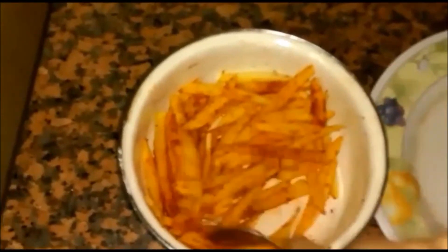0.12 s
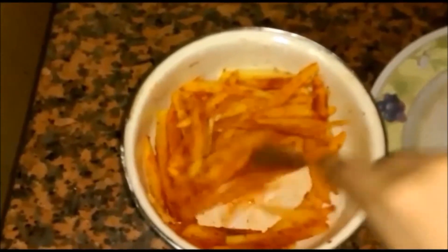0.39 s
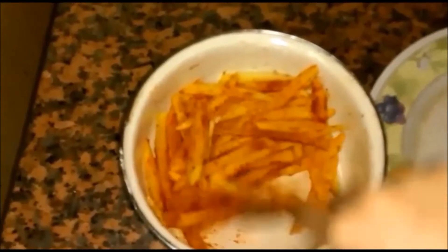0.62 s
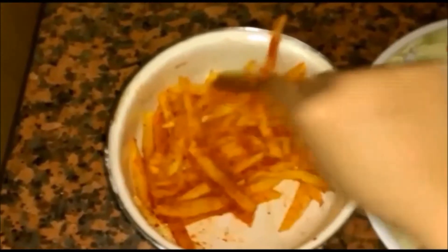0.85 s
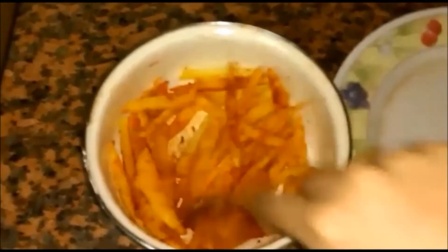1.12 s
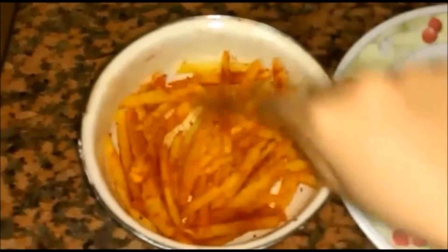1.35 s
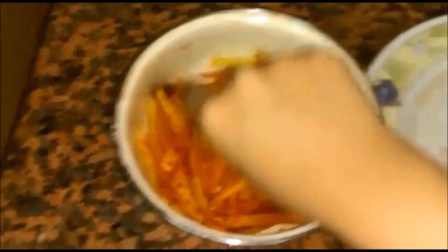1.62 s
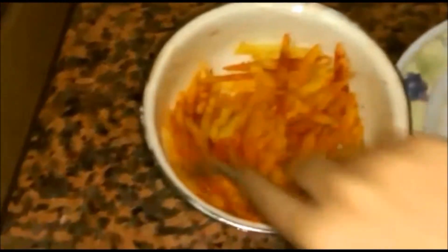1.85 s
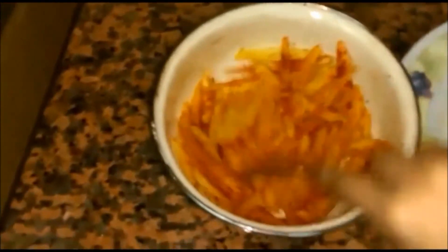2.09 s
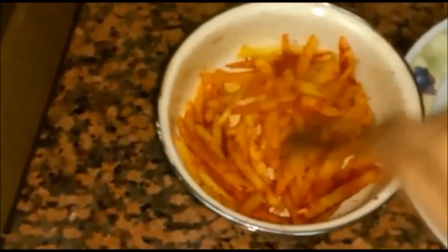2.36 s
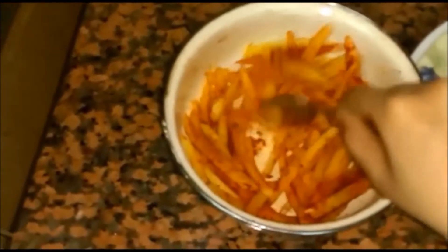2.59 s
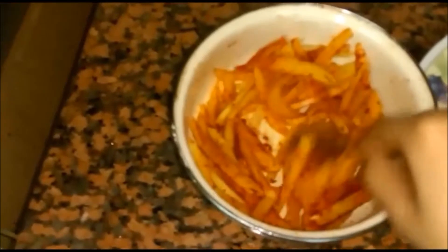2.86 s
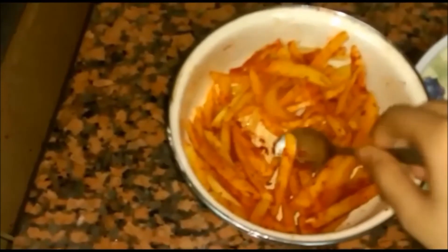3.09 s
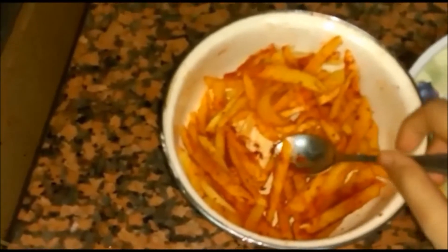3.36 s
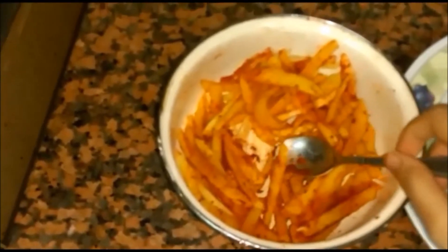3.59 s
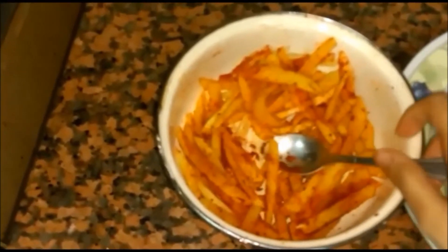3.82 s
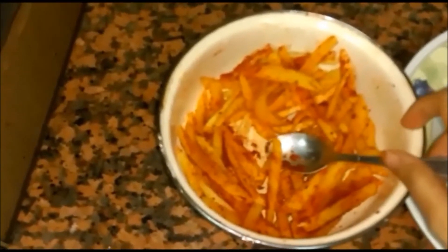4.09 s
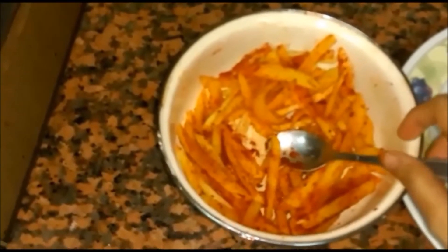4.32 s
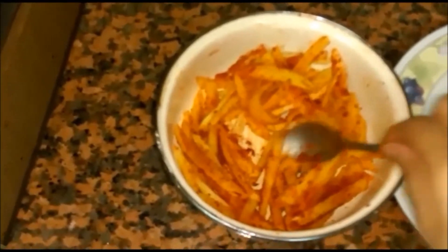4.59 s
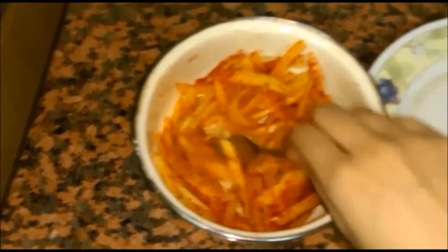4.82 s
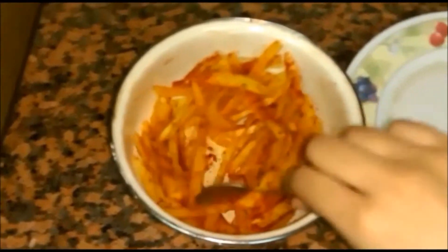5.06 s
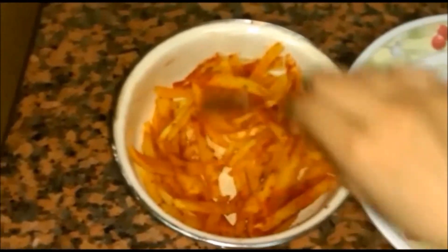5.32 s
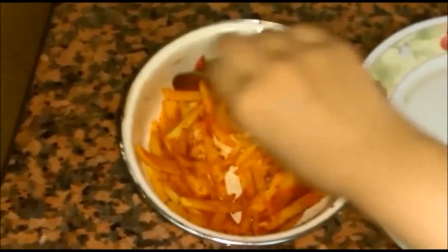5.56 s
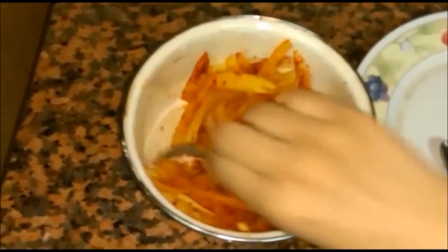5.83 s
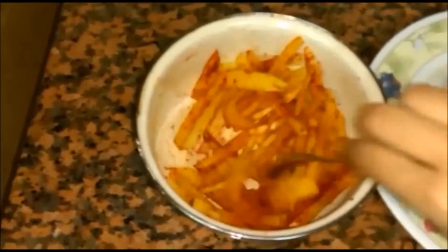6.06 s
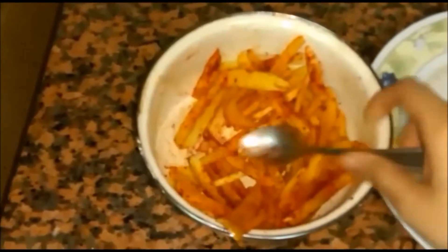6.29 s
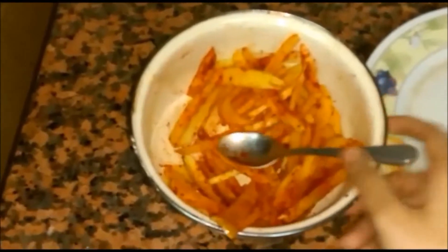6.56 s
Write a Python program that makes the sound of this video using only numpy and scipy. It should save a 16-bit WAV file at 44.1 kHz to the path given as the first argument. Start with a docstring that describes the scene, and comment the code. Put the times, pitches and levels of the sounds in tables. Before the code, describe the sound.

Dull spoon taps and short gritty scrapes while stirring food in a bowl, a quiet pause midway, then three quick bright clinks at the end.

```python
"""Over steady air hiss, a fridge hum and hand rumble, a steel spoon scrapes, knocks and clinks in an enamel bowl.
The bowl stands on a stone counter, mostly left of a hand-held phone with two ports, in a small hard kitchen.
Short contacts ring the spoon's thin modes and the food-damped bowl; streams of tiny impacts make the scrapes.
Once the bowl rattles on the stone. Echoes and a noise tail place all this in the room.
The air, fan, hum and hand are shaped noise, with a steady-pitched tone for the lowest hum line."""
import sys
import numpy as np
from scipy import signal
from scipy.fft import rfft, irfft, next_fast_len
from scipy.io import wavfile

SR = 44100
rng = np.random.default_rng(int(sys.argv[2]) if len(sys.argv) > 2 else 0)


def elevation(decibels):
    """Turn decibel levels (scalar or array-like) into linear amplitude ratios."""
    levels = np.asarray(decibels, float)
    return 10 ** (levels / 20)


def wrap_up_sound(samples):
    """Save the sound to the file named by the first command line argument, as 16-bit audio."""
    columns = np.atleast_2d(samples).T
    # keep every value between -1 and 1, then stretch to whole-number steps
    tamed = np.clip(columns, -1, 1)
    steps = np.round(tamed * 32767).astype(np.int16)
    wavfile.write(sys.argv[1], SR, steps)


N = 294588
T = np.arange(N) / SR

# spoon lands in the food-covered bowl: t/s, peak level at 2.4 kHz/dB, tilt/dB per octave,
# arch/dB per octave squared, left minus right/dB
KNOCK_EVENTS = [(.1004, -43, 8.5, -2.2, -24.5), (.1133, -48.5, -3, 5, -10), (0.2102, -39.5, 3, -6.5, -19),
                (0.2164, -64, -17, 6, 19), (0.2231, -41.5, 13.5, -11, -12), (.3641, -55, -5, 5.5, 2.2),
                (.4032, -20, 0.44, 0.33, 21), (.6878, -21, -3, -9.5, 9), (0.7381, -28, -4.5, -4.5, 27.5),
                (0.7419, -33, 11, -4.5, 6), (1.0328, -50.5, 2.2, -5, 9), (1.7576, -30, 5, -2.2, 5),
                (2.0092, -57, 1.5, 0.3, 6), (2.099, -29, -5.5, -0.8, 19), (2.79, -50, -14.5, -5.5, 23),
                (3.6094, -71, .1, 2.5, -3), (3.6824, -61.5, 9, -3, -27), (3.7328, -66, 3, .6, .1),
                (3.7439, -59, -2, 2.2, -3), (3.912, -72, 1, 4.5, 1.2), (4.0306, -34.5, 7, -4.5, 14),
                (4.4206, -65.5, -11, 7, 10.5), (4.8901, -39, -5, -1.5, 12), (5.669, -35, 7.5, -1.8, 23.5),
                (5.8496, -50.5, 1, 2.5, 14), (6.2394, -52, -7, -3, 6), (6.465, -59.5, 6, 0, 10.5),
                (6.6215, -25, 3, 0, 16.5), (6.6387, -24.5, 9, -4, 7), (6.6564, -30.5, 5, -1.3, 13)]
# ringing modes of the steel spoon: f/Hz, level/dB, t60/s,
# share at the right port (each mode beams its own way, minus = opposite lobe)
SPOON_MODES = [(1545, -9, .13, .45), (1665, -7, .07, .45), (1800, -4, .03, .4), (2600, 0, .19, -1.1),
               (2815, -14, .1, -.7), (3512, 0, .24, .5), (4250, 0, .16, .6), (4716, -5, .13, .6),
               (5068, -1, .17, .6), (5375, -11, .1, .6), (5852, -6, .07, .6), (6470, 0, .07, -.8),
               (7246, -12, .12, .6), (7531, -3, .12, .6), (8694, -9, .06, .3), (9232, 0, .07, .2),
               (9415, -3, .09, .3), (9680, -7, .06, .3), (9938, -7, .07, .4), (11500, -16, .04, .6)]
# modes of the enamel bowl under its food: f/Hz, level/dB, t60/s
BOWL_MODES = [(350, -19, .02), (620, -12, .01), (1150, 0, .009), (1650, 0, .009), (2600, 0, .006),
              (3650, 0, .004), (4700, 0, .004), (5800, -1, .004), (7700, -3, .004), (8500, -3, .004),
              (9400, 0, .005), (10400, -4, .004), (11700, -9, .003), (13500, -11, .002)]
# first blow of the bowl on the stone: t/s, level/dB
FIRST_BLOW = (2.1, -21)


def unit(x):
    """Scale to rms 1."""
    return x / np.sqrt(np.mean(x ** 2, axis=-1, keepdims=True))


def add(out, s, sound):
    """Mix a sound in at time s, cutting what runs past the end."""
    i = int(s * SR)
    out[..., i:i + sound.shape[-1]] += sound[..., :N - i]


def shaped(gain, channels):
    """Noise whose spectrum is gain(Hz), rms 1."""
    size = next_fast_len(N)
    hz = np.maximum(np.arange(size // 2 + 1) * SR / size, 1)
    spectrum = rfft(rng.standard_normal((channels, size))) * gain(hz)
    return unit(irfft(spectrum, size)[:, :N])


def peak(hz, width):
    """Gain curve of a resonance, width taken at half amplitude."""
    return lambda f: 1 / (1 + (2 * (f - hz) / width) ** 2)


def swell(s, db, rise_s, fall_s):
    """Gain that climbs evenly in dB to its peak at s and sinks again."""
    swell_db = 21.5  # change within one rise or fall time
    return elevation(db - swell_db * np.maximum((s - T) / rise_s, (T - s) / fall_s))


def ports(sound, pan_db):
    """Rows: left port, right port, and what goes out into the room."""
    return elevation(np.array([[pan_db / 2], [-pan_db / 2], [0]])) * sound


def alike(hz):
    """Share of a diffuse field's power that both ports hear the same, mostly in the bass."""
    return 0.18 / (1 + (hz / 650) ** 3)


def air():
    """Diffuse air noise: a part common to both ports plus a separate part at each."""
    # f/Hz, relative spectrum level/dB per Hz
    air_rows = [(18, -44), (30, -7), (184, -8.5), (227, -13), (295, -13.5), (600, -16.5), (937, -17.5),
                (1160, -14), (1460, -18), (2410, -14.5), (3400, -23), (8740, -25.5), (16000, -38.5)]
    hz, db = np.transpose(air_rows)

    def colour(f):
        return elevation(np.interp(np.log(f), np.log(hz), db))

    common = elevation(-3.0) * shaped(lambda f: colour(f) * np.sqrt(alike(f)), channels=1)
    separate = shaped(lambda f: colour(f) * np.sqrt(1 - alike(f)), channels=2)
    return elevation(-55) * unit(common + separate)


def fan():
    """Fan noise: resonant bands of noise, separate at each port."""
    # f/Hz, width/Hz, level/dB
    fan_bands = [(1171, 43, -68.5), (2270, 50, -86.5), (4670, 45, -78.5), (8340, 120, -86)]
    return sum(elevation(db) * shaped(peak(hz, width), channels=2) for hz, width, db in fan_bands)


def hum():
    """Hum lines: very narrow noise bands, the same at both ports."""
    # f/Hz, width/Hz, level/dB
    hum_lines = [(88.4, 2.7, -67.5), (97.2, 4.7, -64.5), (169, 2.9, -75), (295.7, 1.1, -76)]
    return sum(elevation(db) * shaped(peak(hz, width), channels=1) for hz, width, db in hum_lines)


def fridge():
    """Lowest fridge hum: a steady-pitched tone and a narrow noise band that rise and fall together."""
    # level of the tone ahead of its slight pan: t/s, level/dB
    fridge_rows = [(0.0, -70), (.2, -56), (.71, -66), (1.4, -62.5), (2.3, -62), (2.62, -68), (3.68, -60.5),
                   (3.98, -82), (4.5, -60), (4.95, -54), (5.06, -51), (5.19, -55.5), (6.68, -55.5)]
    level = elevation(np.interp(T, *np.transpose(fridge_rows)))
    tone = np.sqrt(2) * np.sin(2 * np.pi * 49.2 * T)
    throb = 0.36 * shaped(peak(59.4, 6.4), channels=2)
    left, right = level * (tone + throb)
    return ports(np.array([left, right, left]), 0.79)[:2]


def hand():
    """Palm shifts on the phone: swells of low noise, stronger at the left port."""
    # t of peak/s, level ahead of the port gains/dB, rise/s, fall/s
    palm_shifts = [(.24, -52.5, .9, .4), (.45, -49, 0.13, 0.073), (.82, -50, 0.29, 0.15),
                   (1.23, -44.5, .55, .12), (1.51, -50, .14, .24), (1.69, -47.5, .06, 0.24),
                   (2.1, -48.5, .06, .16), (3.68, -56, .05, 0.15), (4.13, -53.5, .05, .14),
                   (4.39, -45.5, .06, 0.093), (4.72, -53.5, 0.065, 0.082), (4.87, -51, .07, .3),
                   (5.02, -48, .3, .11), (5.55, -64, .5, .9)]
    level = sum(swell(*row) for row in palm_shifts)
    port_gains = elevation(np.array([[4.0], [-9.0]]))
    return level * shaped(peak(86.0, 59.0), channels=2) * port_gains


def background():
    """Everything that is already diffuse or at the phone, so needs no echo."""
    return air() + fan() + hum() + fridge() + hand()


def ring(modes, colour_hz=(1, 2), colour_db=(0, 0), share=1):
    """Response of a body to a tap; where it is struck colours the modes, and neighbours swing opposite ways."""
    hz, db, t60 = np.transpose(modes)[:3, :, None]
    t = np.arange(int(.3 * SR)) / SR
    colour = np.interp(np.log(hz), np.log(colour_hz), colour_db)
    gain = elevation(db + colour) * (-1) ** np.arange(len(hz))[:, None]
    decay = np.exp(-np.log(1000) * t / t60)
    return np.sum(share * gain * decay * np.sin(2 * np.pi * hz * t), axis=0)


def contact(chatter_s):
    """Hard surfaces meet as a click and a brief chatter; energy 1."""
    push = rng.standard_normal(400) * np.exp(-np.arange(400) / (chatter_s * SR))
    push[0] = 7.5
    return push / np.sqrt(np.sum(push ** 2))


def grit(rate, spread_db):
    """Uneven micro-impacts of either sign, rate per second on average, rms 1."""
    hits = rng.random(N) < rate / SR
    strength = elevation(spread_db * rng.exponential(size=N))
    return unit(hits * strength * rng.choice([-1, 1], N))


def sliding(push, body):
    """A stream of small impacts rings a body, left of the phone."""
    body = body / np.sqrt(np.sum(body ** 2))
    return ports(signal.fftconvolve(push, body)[:N], pan_db=9)


def room_response():
    """Room at the two ports: a few echoes and a noise tail whose decay time depends on pitch."""
    # decay of the kitchen: f/Hz, t60/s
    t60_rows = [(300, 0.22), (2000, 0.3), (8000, 0.33), (14000, 0.16)]
    # echoes off counter and wall: delay/s, left level/dB, right level/dB
    early_echoes = [(.0021, -3, -1), (.0045, -6.5, 2), (.0075, -9, -3.5)]
    t = np.arange(int(.5 * SR)) / SR
    hz, frames, noise = signal.stft(rng.standard_normal((3, len(t))), SR, nperseg=256)
    common = np.sqrt(alike(hz))[:, None] * noise[2]
    separate = np.sqrt(1 - alike(hz))[:, None] * noise[:2]
    t60_hz, t60_s = np.transpose(t60_rows)
    t60 = np.interp(np.log(hz + 1), np.log(t60_hz), t60_s)
    decay = np.exp(-np.log(1000) * frames / t60[:, None])
    tail = signal.istft((common + separate) * decay, SR, nperseg=256)[1][:, :len(t)]
    tail = tail * np.clip(t / 0.013, 0, 1)  # builds up over 13 ms
    tail = elevation(0.5) * tail / np.sqrt(np.sum(tail ** 2, axis=1, keepdims=True))
    for s, left_db, right_db in early_echoes:
        # rough surfaces smear each echo
        smear = np.array([contact(.0008), contact(.0008)])
        add(tail, s, elevation(np.array([[left_db], [right_db]])) * smear)
    return tail


def kitchen(near):
    """Direct sound, later at the right port, plus what the room sends back."""
    lag = int(.0002 * SR)  # 0.2 ms, in samples
    # the left port faces the bowl, so its cavity resonance is driven harder
    cavity = elevation(-16.0) * signal.lfilter(*signal.iirpeak(9000, 2.5, SR), near[0])
    direct = np.array([near[0] + cavity, np.roll(near[1], lag)])
    return direct + signal.fftconvolve(room_response(), near[2:])[:, :N]


def thud(chatter):
    """Bowl comes down on the stone: one blow and a short chatter ring the counter."""
    # t of peak/s, level/dB, rise/s, fall/s
    thud_swell = (2.104, -32.5, 0.0087, 0.04)
    # modes of the stone counter: f/Hz, level/dB, t60/s
    counter_modes = [(217, -3, 0.085), (368, -8.5, 0.064), (715, 4, 0.055), (1340, -12, 0.033),
                     (1540, -13, 0.032), (2000, 5.5, 0.014), (2640, -9, 0.028), (3320, 3, 0.0078)]
    push = swell(*thud_swell) * chatter
    blow_s, blow_db = FIRST_BLOW
    add(push, blow_s, elevation(blow_db) * contact(0.00054))
    sound = sliding(push, ring(counter_modes))
    return signal.sosfilt(signal.butter(2, 150, "high", fs=SR, output="sos"), sound)


def clatter(chatter):
    """The same chatter rings the bowl itself, from the first blow on."""
    # t of peak/s, level/dB, rise/s, fall/s
    clatter_swell = (2.122, -35.5, 0.0331, 0.01)
    push = swell(*clatter_swell) * (T > FIRST_BLOW[0]) * chatter
    return sliding(push, ring(BOWL_MODES, (2000, 8300), (-6, 3)))


def rubbed(bass_db, treble_db):
    """Bowl and, more faintly, spoon as a rub excites them, weighted below 2.6 and above 3.65 kHz."""
    colour_hz, colour_db = (2600, 3650), (bass_db, treble_db)
    return ring(BOWL_MODES, colour_hz, colour_db) + elevation(-25) * ring(SPOON_MODES, colour_hz, colour_db)


def scrapes():
    """Spoon drags along the wall or through the food: swelling grit rings bass and treble modes apart."""
    # t of peak/s, level of the bass part ahead of the pan/dB, rise/s, fall/s, treble over bass/dB
    drags = [(.105, -52.5, .006, 0.13, -1.5), (1.12, -62, .1, 0.26, -4.5), (1.825, -55.5, .04, 0.11, -2.5),
             (2.7, -63.5, .12, 0.15, -12), (3.02, -67.5, .18, .07, -11), (5.14, -76, .1, 0.11, 5),
             (5.3, -68.5, 0.18, 0.061, -18), (5.69, -58.5, 0.033, 0.11, 2), (5.78, -55.5, .14, .045, -5),
             (5.91, -67, .1, .05, -14)]
    drag = grit(2500., 2.3)
    bass = sum(swell(*row[:4]) for row in drags)
    treble = sum(elevation(row[4]) * swell(*row[:4]) for row in drags)
    return sliding(bass * drag, rubbed(0, -67)) + sliding(treble * drag, rubbed(-78, 0))


def knocks():
    """Food damps the bowl within a few cycles; each port catches its own chatter, the room a bare click."""
    out, hz = np.zeros((3, N)), np.array(BOWL_MODES)[:, 0]
    octaves = np.log2(np.clip(hz, 1100, 9000) / 2400)
    for s, db, tilt_db, arch_db, pan_db in KNOCK_EVENTS:
        body = ring(BOWL_MODES, hz, db + tilt_db * octaves + arch_db * octaves ** 2)
        pushes = np.array([contact(0.0034), contact(0.0011), np.eye(400)[0]])
        add(out, s, ports(signal.fftconvolve(body[None], pushes), pan_db))
    return out


def clinks():
    """Spoon modes ring from the nearest knock until the next damps them; the bowl shades them from the room."""
    # spoon strikes the rim: t/s (moved to the nearest knock), strike level at 4.7 kHz/dB, tilt/dB per octave,
    # f the struck spot favours or mutes/Hz, by how much/dB
    strikes = [(.688, -39.5, -4, 2603, 11), (1.757, -30.5, 11.5, 6770, -23), (2.01, -61, 4, 6800, -17),
               (4.031, -49, -4, 5800, 10.5), (5.668, -45, 2.5, 2850, 11), (6.239, -69, -13, 3500, 4),
               (6.621, -35, -7, 6620, 28), (6.639, -38, -3, 3500, 12), (6.657, -35, 1.2, 3500, 8)]
    out = np.zeros((3, N))
    landings = np.append(np.array(KNOCK_EVENTS)[:, 0], np.inf)
    modes = np.array(SPOON_MODES)
    hz = modes[:, 0]
    reach = np.clip(hz, 2600, 9300)
    shares = (1, modes[:, 3:], elevation(-12))  # left port, right port, room
    for s, db, tilt_db, spot_hz, spot_db in strikes:
        k = np.argmin(abs(landings - s))
        # the favour of the struck spot fades over 0.29 octave
        spot = spot_db * np.exp(-(np.log2(reach / spot_hz) / 0.29) ** 2)
        colour = db + tilt_db * np.log2(reach / 4700) + spot
        body = np.array([ring(SPOON_MODES, hz, colour, share) for share in shares])
        age_s = np.arange(body.shape[1]) / SR
        damped_s = np.maximum(age_s - (landings[k + 1] - landings[k]), 0)
        add(out, landings[k], body * np.exp(-damped_s / 0.0042))
    return out


def scene():
    """Everything at the bowl passes through the room; the background is already diffuse or at the phone."""
    chatter = grit(6000., 1.5)
    small = scrapes() + clatter(chatter) + knocks() + clinks()
    # spoon and bowl are too small to radiate bass, and no contact is short enough for the top octave
    band = signal.butter(2, (280, 15000), "band", fs=SR, output="sos")
    small = signal.sosfilt(band, small)
    return kitchen(small + thud(chatter)) + background()


def low_pass(x):
    """Removes everything above the highest recorded frequency."""
    return signal.sosfilt(signal.butter(12, 16510, fs=SR, output="sos"), x)


def record(dry):
    """The phone cuts the top above 15.8 kHz and its converter adds a small constant offset."""
    top_cut = signal.ellip(6, .3, 30, 15800, fs=SR, output="sos")
    mix = signal.sosfilt(top_cut, dry) + 0.00099
    return low_pass(mix)


dry = scene()
out = record(dry)
wrap_up_sound(out)
```